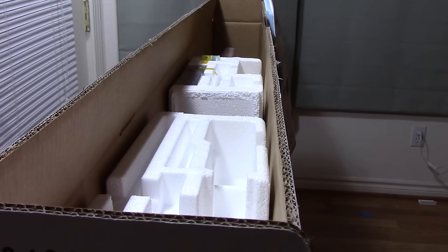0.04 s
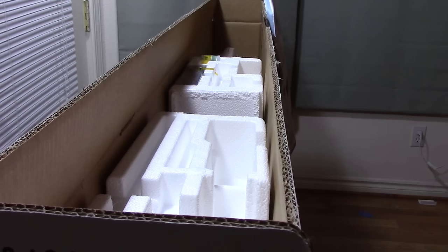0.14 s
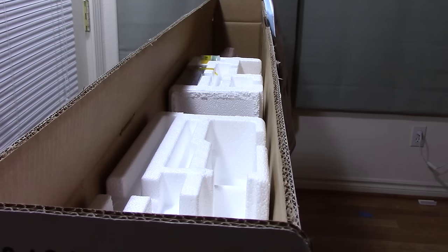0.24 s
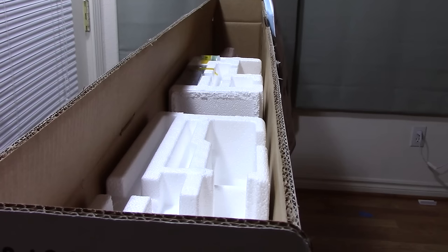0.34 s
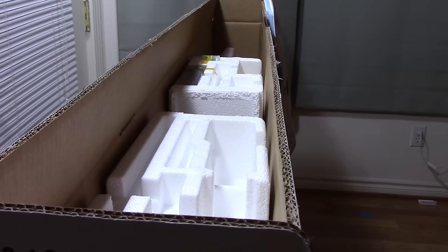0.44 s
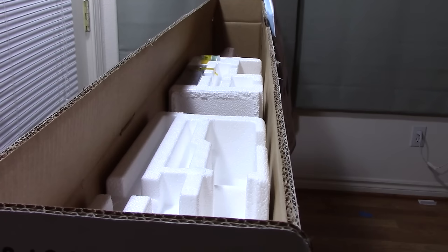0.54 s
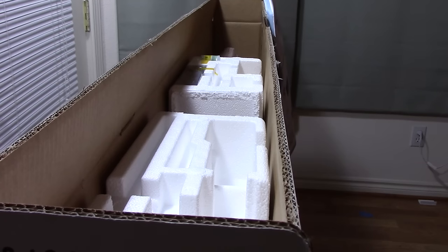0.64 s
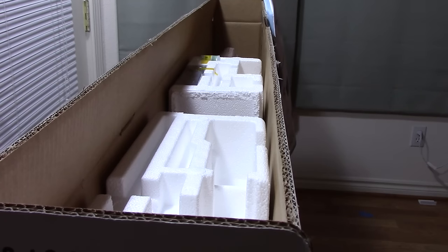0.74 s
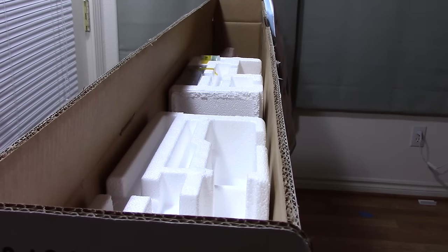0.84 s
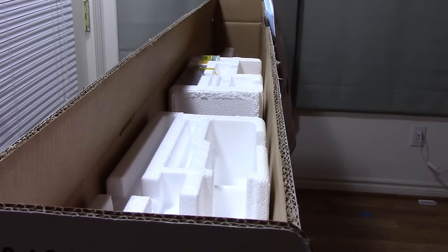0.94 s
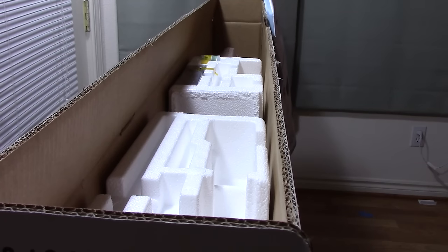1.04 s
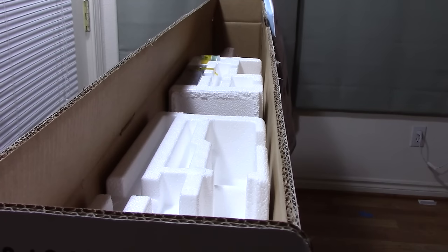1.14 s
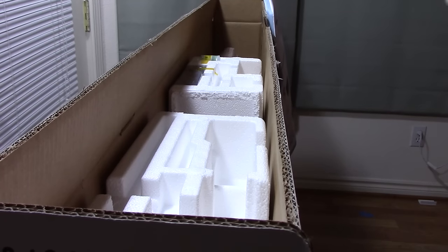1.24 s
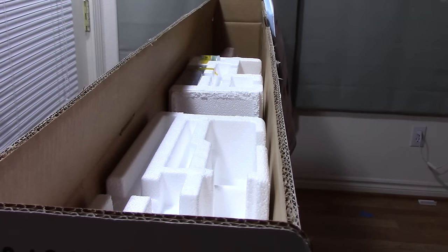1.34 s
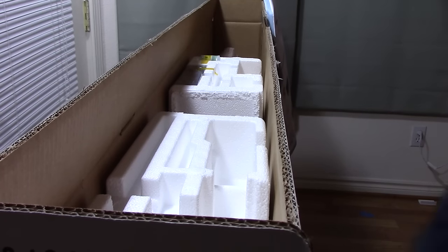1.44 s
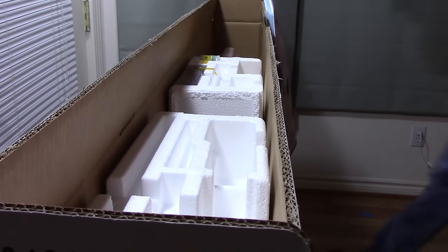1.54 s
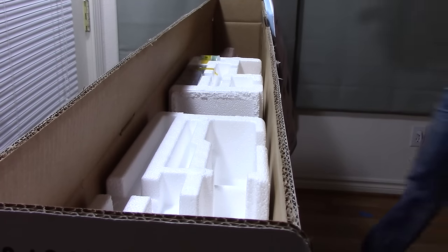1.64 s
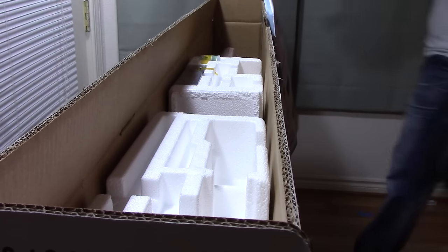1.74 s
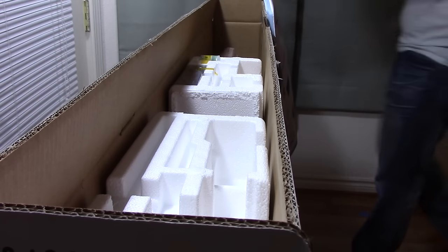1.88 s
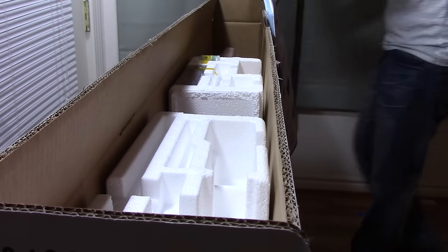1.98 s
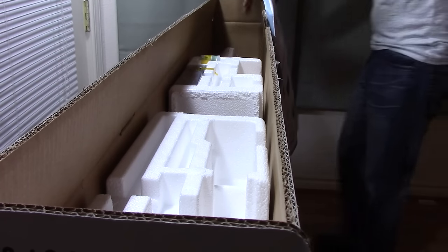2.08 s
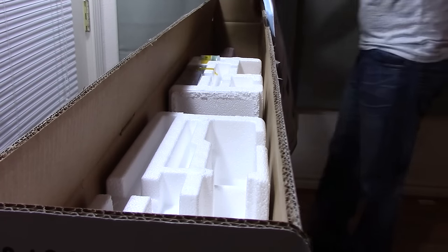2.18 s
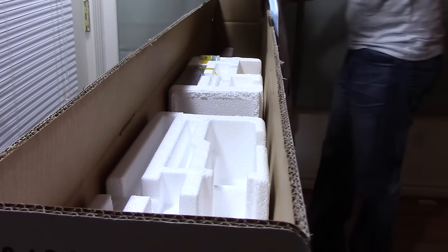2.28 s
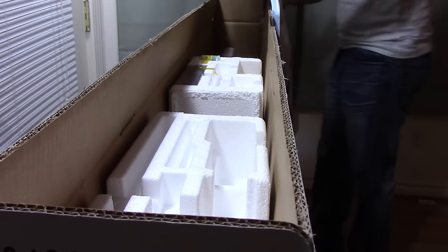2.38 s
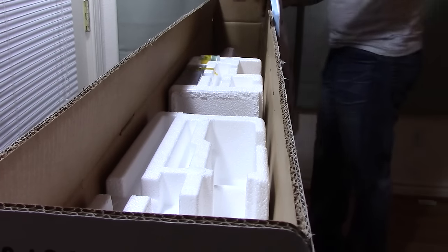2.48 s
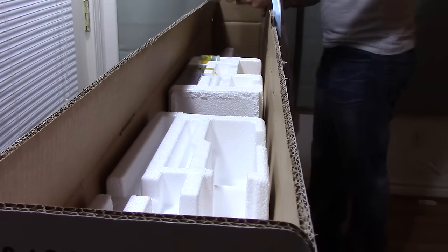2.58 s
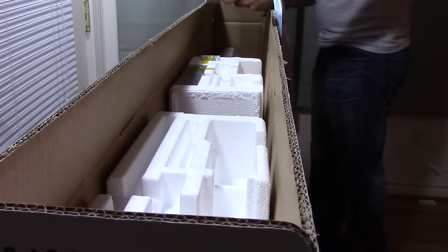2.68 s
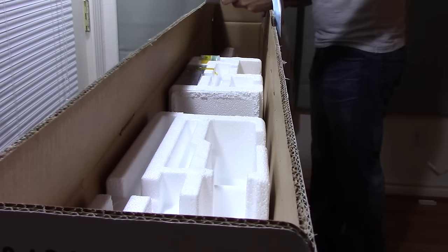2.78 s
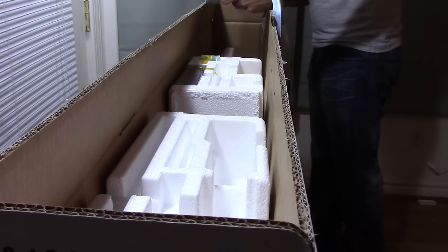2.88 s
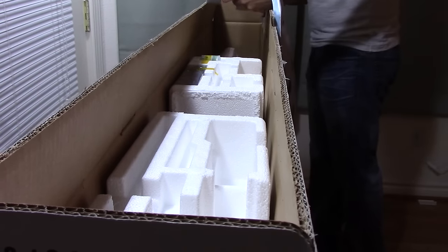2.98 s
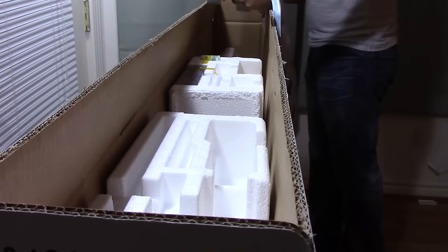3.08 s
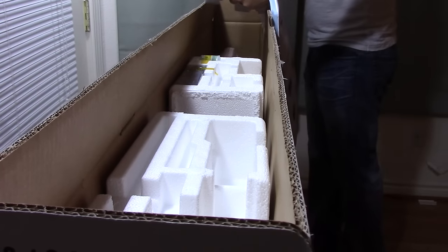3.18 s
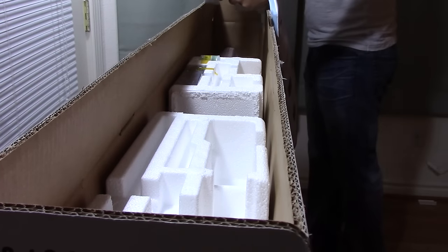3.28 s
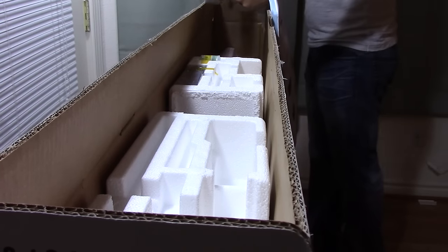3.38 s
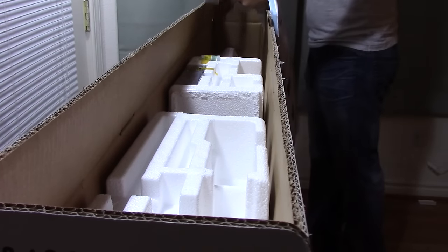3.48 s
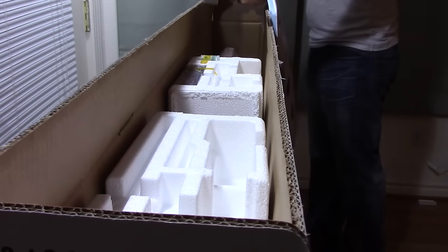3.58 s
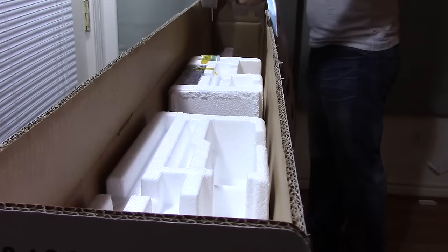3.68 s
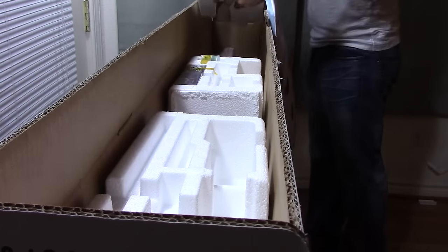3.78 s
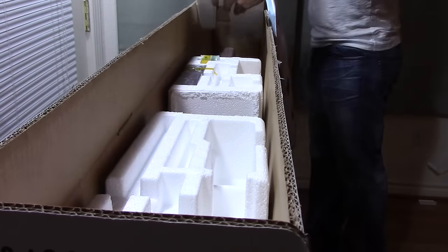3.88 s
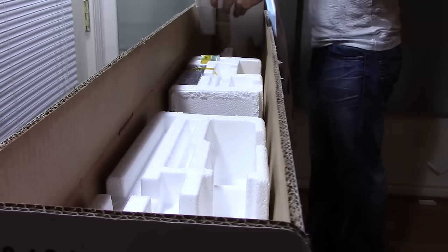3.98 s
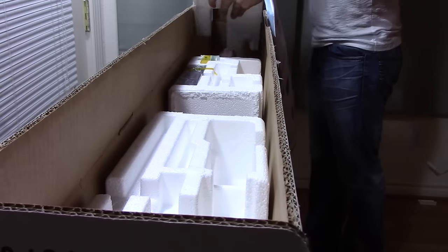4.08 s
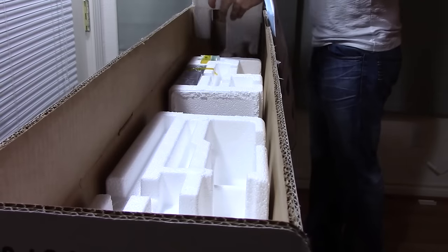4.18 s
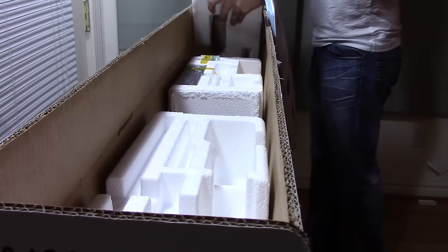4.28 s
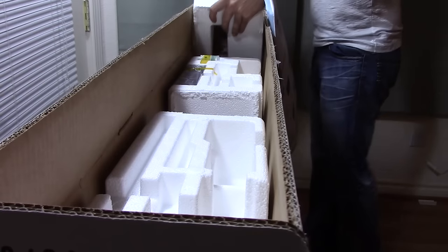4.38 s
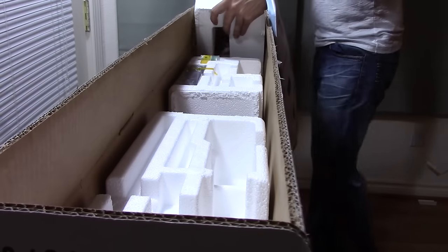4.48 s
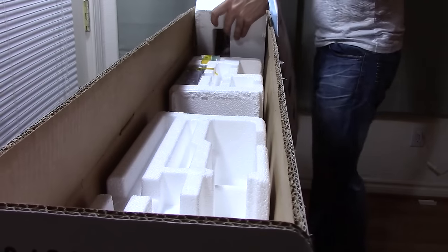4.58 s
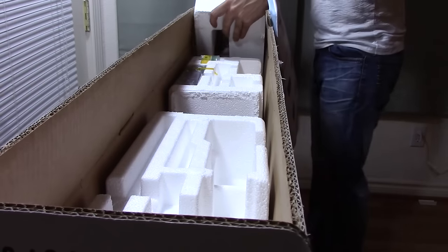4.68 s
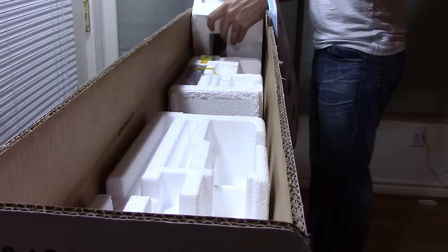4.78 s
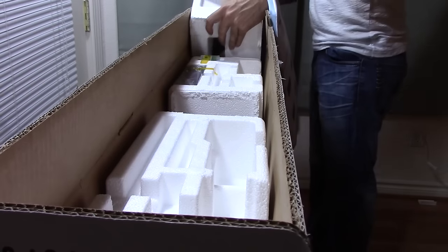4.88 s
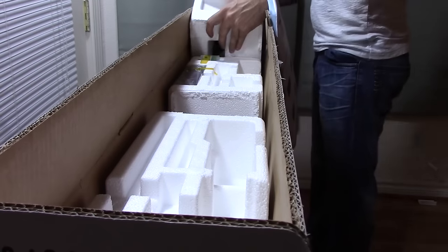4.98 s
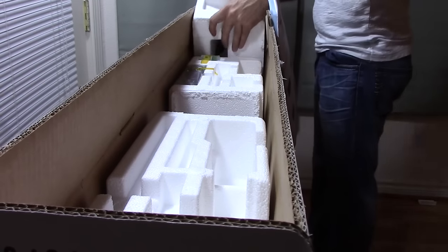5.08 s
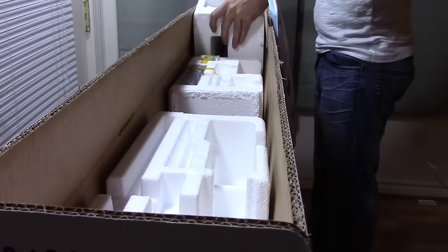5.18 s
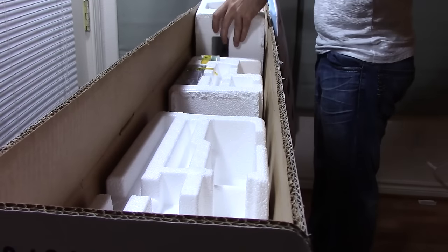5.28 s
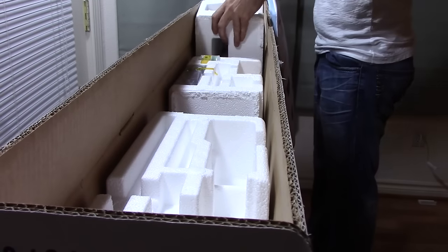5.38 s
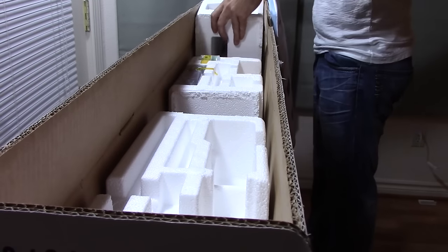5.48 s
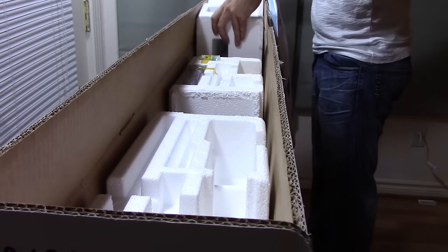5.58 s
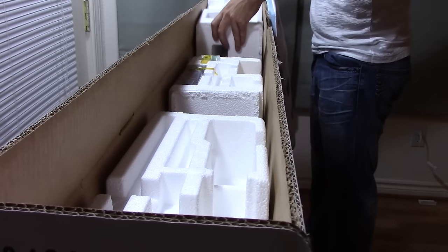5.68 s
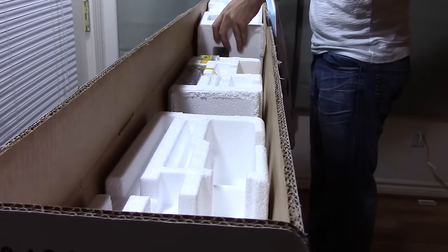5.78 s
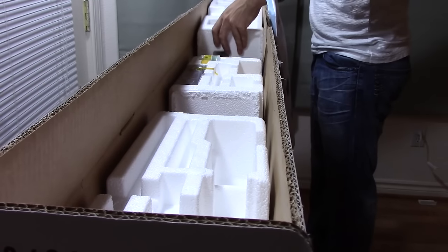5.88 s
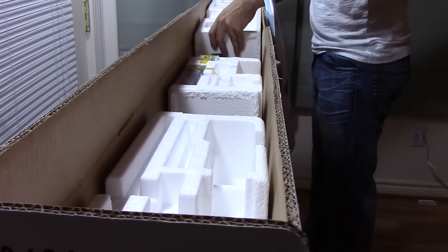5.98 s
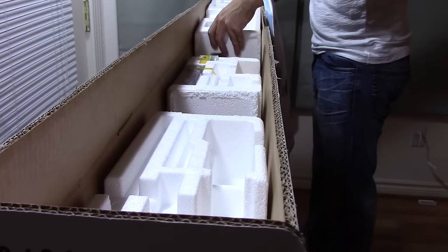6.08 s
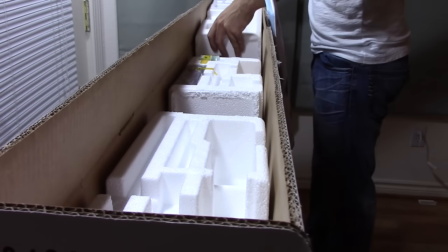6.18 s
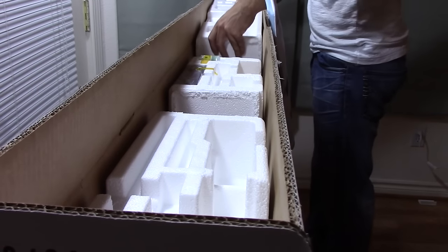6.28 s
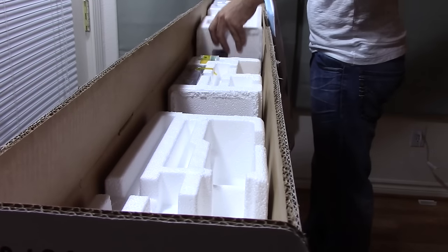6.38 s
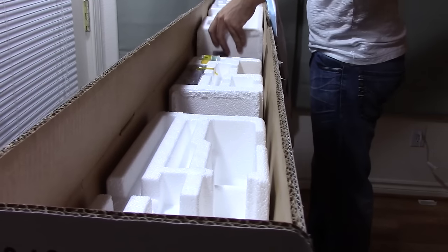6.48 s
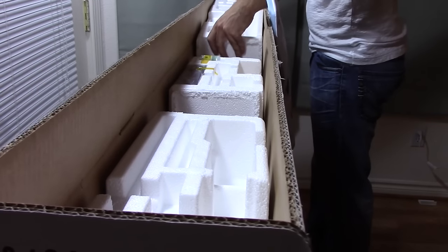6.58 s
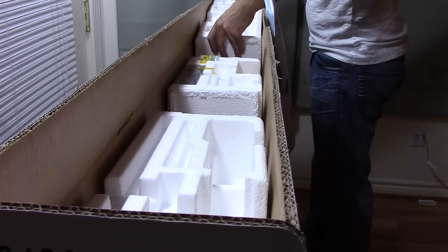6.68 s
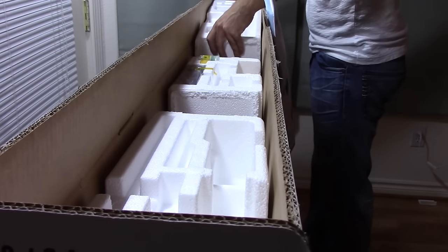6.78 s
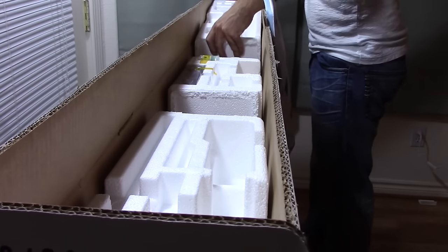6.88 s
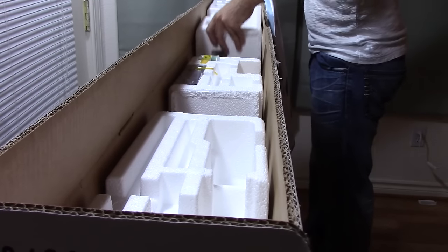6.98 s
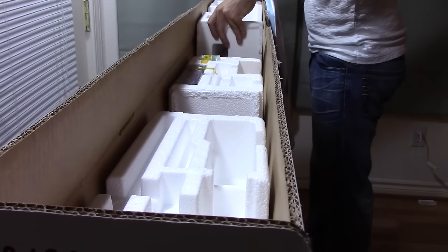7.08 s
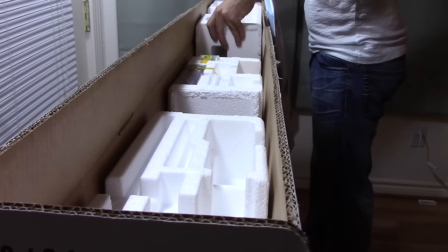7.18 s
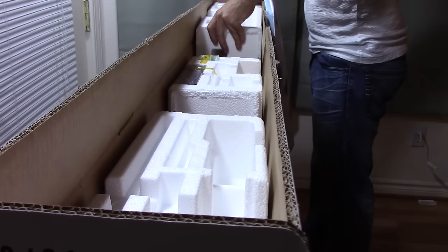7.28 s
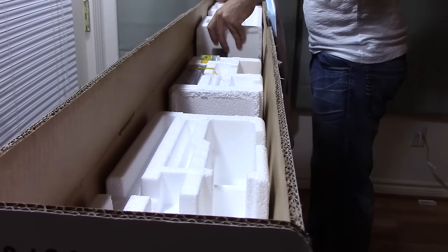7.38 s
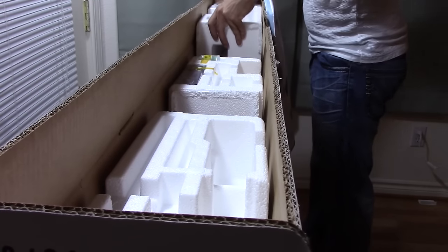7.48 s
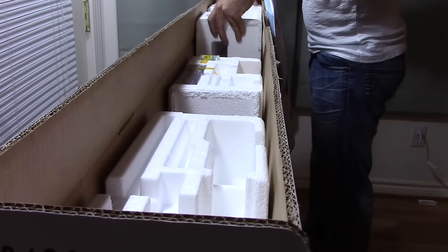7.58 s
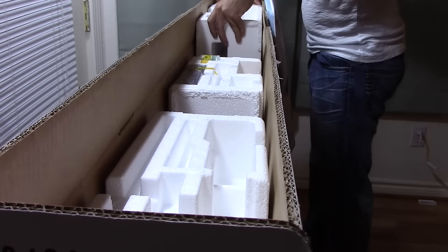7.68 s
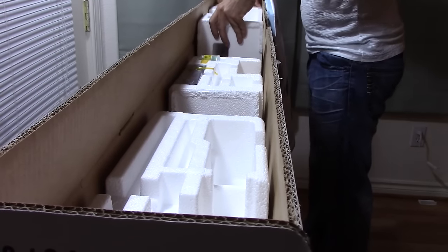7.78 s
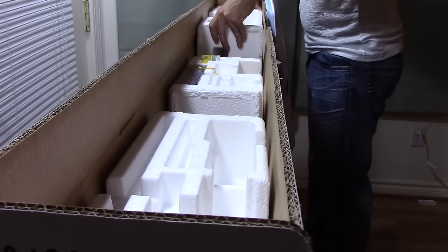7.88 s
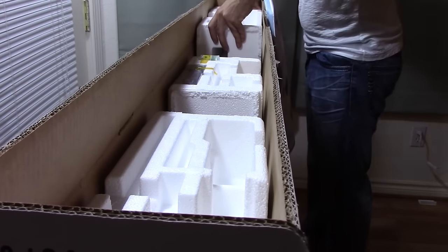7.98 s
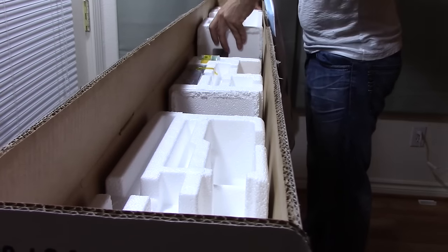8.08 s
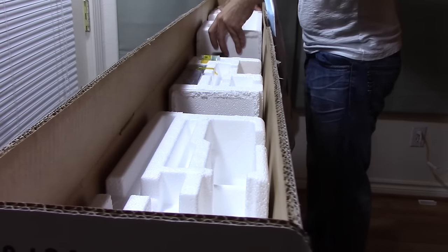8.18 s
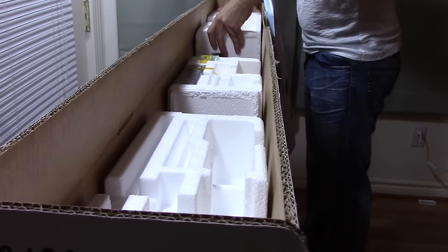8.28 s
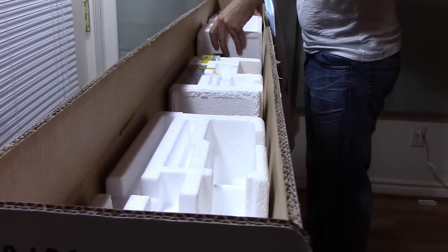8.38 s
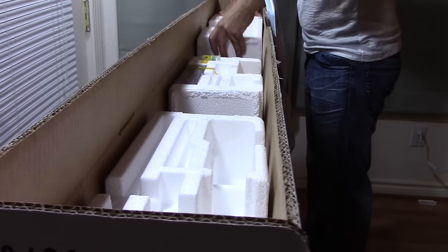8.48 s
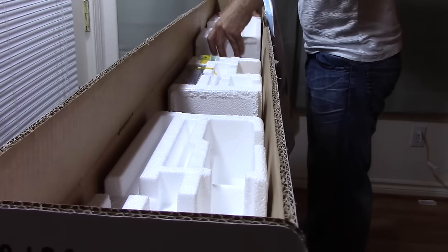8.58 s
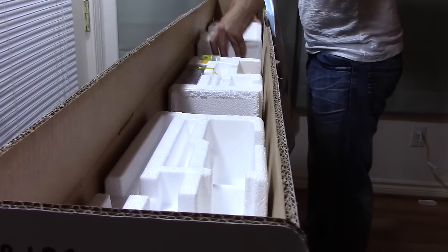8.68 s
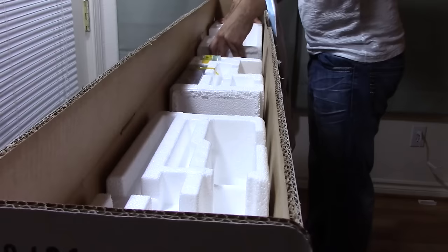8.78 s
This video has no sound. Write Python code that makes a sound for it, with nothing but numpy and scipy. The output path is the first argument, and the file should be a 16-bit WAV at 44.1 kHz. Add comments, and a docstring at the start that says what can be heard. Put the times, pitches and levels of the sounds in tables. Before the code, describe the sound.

After soft footsteps and a sharp click, dry foam rasps and squeaks along a big carton, bumping it with one strong hollow thump.

```python
"""Feet and clothes shuffle and step over a wooden floor to a tall carton; then a foam block is worked into it.
Foam beads catch and slip on the cardboard: random snaps, coloured, give scuffs, long dry scrapes and squeaks.
Bumps ring the hollow box as decaying sines with a noise rattle; steps and clicks are short filtered bursts.
A small room answers with a decaying noise tail over a soft ventilation rush; heard close by, almost in mono."""
import sys
import numpy as np
from scipy import signal
from scipy.fft import rfft, irfft, next_fast_len
from scipy.io import wavfile
from scipy.ndimage import uniform_filter1d, map_coordinates

SR = 44100
rng = np.random.default_rng(int(sys.argv[2]) if len(sys.argv) > 2 else 0)


def bounce(signal):
    """Save signal as a 16-bit WAV file at the path given by the first command-line argument."""
    frames = np.transpose(np.atleast_2d(signal))
    limited = np.clip(frames, -1, 1)
    pcm = np.round(limited * 32767).astype(np.int16)
    wavfile.write(sys.argv[1], SR, pcm)


N = 390285  # samples


def amp(db):
    """Decibels to gain."""
    return 10 ** (np.asarray(db) / 20)


def unit(x):
    """x at rms 1."""
    return x / np.sqrt(np.mean(x ** 2) + 1e-20)


def along(points, hz):
    """(Hz, value) points read on a log axis."""
    point_hz, value = np.transpose(points)
    return np.interp(np.log(hz + 1), np.log(point_hz + 1), value)


def wobble(rate_hz):
    """A smooth random curve, rate_hz knots a second."""
    knots = rng.standard_normal(int(N * rate_hz / SR) + 4)
    return map_coordinates(knots, [np.arange(N) * rate_hz / SR])


def colour(x, points, peaks=(), size=4096):
    """Causal minimum-phase filter of power gain 1 with the given spectrum and resonances."""
    hz = np.fft.rfftfreq(size, 1 / SR)
    db = along(points, hz)
    for centre_hz, width_hz, lift_db in peaks:
        db = db + lift_db / (1 + (2 * (hz - centre_hz) / width_hz) ** 2)
    cepstrum = irfft(np.log(amp(db)))
    cepstrum[0] = 0
    response = irfft(np.exp(rfft(2 * cepstrum[:size // 2], size)))
    return signal.fftconvolve(x, response / np.linalg.norm(response))[:len(x)]


def soften(x, hz):
    """A soft contact loses what lies above hz; the first 20 ms come out at rms 1."""
    low = signal.butter(4, min(hz, SR / 4), fs=SR, output="sos")
    y = signal.sosfilt(low, x)
    return y / np.sqrt(np.mean(y[:SR // 50] ** 2))


def add(track, s, sound):
    """Mix a sound into the track at time s."""
    start = max(round(s * SR), 0)
    track[start:start + len(sound)] += sound[:N - start]


def slips(rate_hz, clump_db, clump_rate_hz):
    """Random tiny snaps, in clumps, as contacts let go; rms 1."""
    snaps = (rng.random(N) < rate_hz / SR) * rng.standard_normal(N)
    return unit(snaps * amp(clump_db * wobble(clump_rate_hz)))


COAST_DB_PER_S, SAG_DB_PER_S = 127, 10  # speed: run-out after the stroke, sag throughout


def strokes(rows, powers):
    """One gain per dB column for strokes that speed up, sag and coast; each grows with a power of the speed."""
    energy, t = np.zeros((len(powers), N)), np.arange(SR) / SR
    for s, rise_s, length_s, *levels_db in rows:
        gather = np.sin(np.pi / 2 * np.minimum(t / rise_s, 1))
        coast_s = np.maximum(t - length_s, 0)
        speed = gather * amp(-SAG_DB_PER_S * t - COAST_DB_PER_S * coast_s)
        for layer, db, power in zip(energy, levels_db, powers):
            add(layer, s, (amp(db) * speed ** power) ** 2)
    return np.sqrt(energy)


# Pushes of the block along the cardboard. Each row: start in seconds, speeding up in seconds,
# length before coasting in seconds, then relative rasp, edge hiss and wall drone in dB.
PUSHES = [(2.92, 0.088, 0.18, -43, -50.5, -51), (3.12, 0.062, 0.15, -49, -65, -52),
          (3.5, 0.045, 0.12, -44.5, -59, -44), (3.63, 0.1, 0.14, -44, -46, -56),
          (3.76, .13, 0.2, -42.5, -40.5, -58), (4.0, .02, .06, -49, -53, -48.5),
          (4.11, 0.06, 0.06, -30, -38.5, -36), (4.2, .075, 0.048, -36.5, -33, -49),
          (4.415, 0.087, 0.092, -34.5, -42, -32.5), (4.54, 0.044, 0.067, -33, -43, -41),
          (4.68, 0.16, .32, -29, -32.5, -37), (4.98, 0.097, 0.18, -34, -34.5, -39),
          (5.15, 0.1, .15, -34.5, -32, -42), (5.3, 0.059, 0.19, -38, -44.5, -46.5),
          (5.41, 0.22, 0.26, -31, -34.5, -41), (5.66, 0.1, .16, -34, -36, -44),
          (5.82, 0.097, 0.11, -34.5, -35.5, -46.5), (5.98, .04, .1, -51, -54.5, -47.5),
          (6.13, 0.11, 0.16, -46, -46.5, -48), (6.3, 0.047, 0.098, -37, -41, -48),
          (6.46, 0.047, .15, -41.5, -43.5, -44.5), (6.62, 0.1, .14, -46, -53.5, -44),
          (6.76, 0.028, 0.084, -45, -49, -46), (6.89, .16, 0.23, -42, -41.5, -45.5),
          (7.13, 0.033, 0.071, -44.5, -50, -45), (7.2, 0.068, 0.059, -33.5, -35.5, -46),
          (7.3, 0.11, 0.085, -39.5, -39, -41.5), (7.42, 0.1, 0.22, -42.5, -45, -44.5),
          (7.73, 0.11, 0.15, -34.5, -37, -45), (8.06, .07, 0.079, -46.5, -51, -49),
          (8.135, .025, 0.037, -38, -40, -44), (8.2, 0.19, 0.15, -30.5, -34, -40),
          (8.4, 0.18, 0.13, -36, -39.5, -37), (8.6, 0.053, .09, -29.5, -30.5, -37.5),
          (8.7, 0.045, 0.11, -36.5, -43, -36.5)]
# Short catches of the foam. Each row: start in seconds, relative rasp in dB, decay length in seconds,
# edge hiss over rasp in dB.
SCUFFS = [(2.684, -44.5, 0.032, -3.5), (2.739, -33, 0.051, -9), (2.802, -49, 0.074, -21),
          (2.958, -37.5, 0.017, -11), (3.21, -42.5, 0.017, -4), (3.365, -60, .015, 2),
          (3.475, -48, 0.041, 2.5), (3.542, -29.5, 0.02, -15), (3.949, -28, 0.025, -4),
          (4.007, -43, 0.015, 7), (4.105, -42, 0.029, 10), (4.262, -35, 0.03, 2.5),
          (4.397, -23.5, 0.029, -2.5), (8.306, -42, 0.052, 5), (8.516, -46, 0.013, 3)]
# Foam block resonances. Each row: centre in Hz, width in Hz, lift in dB.
FOAM_PEAKS = [(1536, 104, 3), (1760, 160, 2), (2720, 140, 3.5), (3270, 890, 1.5), (5280, 540, 1.5),
              (9800, 1500, 7)]
# Carton wall and air modes. Each row: frequency in Hz, relative level in dB, t60 in seconds.
CARTON_MODES = [(133.8, -12.5, 0.38), (199, -10, 0.238), (312.6, 1, 0.092), (320.8, -9, 0.44),
                (343.6, 4, 0.089), (457.7, -4, 0.2), (485, -10, 0.12), (562, -12, 0.14), (628.2, -0.5, 0.2),
                (701, -12.5, 0.16), (773, -2, 0.12), (865, -5, .13), (1003, -35, 0.088), (1097, -20, .12)]
# Spectra of foam rasp, edge hiss and cardboard wall. Each row: frequency in Hz, relative level in dB.
RASP_SPECTRUM = [(200, -33), (500, -1), (900, -0.5), (2000, 1), (3500, -0.5), (5500, -4), (8000, -10.5),
                 (12000, -22.5), (16000, -44)]
HISS_SPECTRUM = [(1500, -38.5), (4000, -5), (7000, -1), (10000, -0.5), (12500, -3.5), (14500, -10.5),
                 (16000, -15)]
WALL_SPECTRUM = [(60, -20.5), (100, -17.5), (140, -3), (300, -0.5), (620, -0.5), (900, -3.5), (1400, -6.5),
                 (3000, -47)]
HISS_POWER, WALL_POWER = 1.55, 0.57  # growth with speed; rasp is 1, so the drone lingers
CATCH_S, CATCH_WALL_DB = 0.0048, -10.5  # a catch's release time; wall drone over its rasp


def scrape():
    """Sliding foam rasps, its edges hiss, and the cardboard wall drones under it."""
    rasp, hiss, wall = strokes(PUSHES, (1, HISS_POWER, WALL_POWER))
    t = np.arange(SR // 4) / SR
    for s, db, length_s, hiss_db in SCUFFS:
        # lets go quickly, runs out as the block slows
        burst = amp(db) * (1 - np.exp(-t / CATCH_S)) * np.exp(-(t / length_s) ** 2)
        add(rasp, s, burst)
        add(hiss, s, burst * amp(hiss_db))
        add(wall, s, burst * amp(CATCH_WALL_DB))

    def beads():
        return slips(rate_hz=14000, clump_db=-0.63, clump_rate_hz=340)

    judder = amp(0.66 * wobble(45))
    rasping = colour(judder * rasp * beads(), RASP_SPECTRUM, FOAM_PEAKS)
    hissing = colour(judder * hiss * beads(), HISS_SPECTRUM)
    box_peaks = [(hz, 28, 4) for hz, _, _ in CARTON_MODES]
    wall_slips = slips(rate_hz=1500, clump_db=2.5, clump_rate_hz=35)
    drone = colour(wall * wall_slips, WALL_SPECTRUM, box_peaks)
    return rasping + hissing + drone


def shifting(x, depth_db, size=7):
    """The contact patch moves, so narrow resonances come and go."""
    z = signal.stft(x, nperseg=1024)[2]
    field = uniform_filter1d(rng.standard_normal(z.shape), size=3, axis=0)  # across frequency
    field = uniform_filter1d(field, size, axis=1)  # across time
    return signal.istft(z * amp(depth_db * unit(field)), nperseg=1024)[1][:N]


# Squeaks on a block resonance. Each row: middle in seconds, half length in seconds,
# frequency in Hz, relative level in dB.
SQUEAKS = [(2.762, 0.023, 1790, -37), (2.762, 0.022, 2910, -41), (3.224, 0.011, 3600, -40),
           (3.563, 0.014, 760, -31.5), (3.702, 0.055, 1920, -43), (3.721, 0.066, 2500, -46),
           (4.164, 0.021, 1090, -33), (4.622, 0.063, 2200, -39), (5.013, 0.056, 662, -35.5),
           (8.2, 0.058, 1540, -39.5), (8.355, 0.069, 1560, -37.5), (8.521, 0.067, 1620, -37.5),
           (8.524, 0.046, 1180, -37), (8.718, .04, 1530, -35), (8.82, 0.091, 1380, -40)]
SQUEAK_Q = 12.5  # sharpness


def squeaks():
    """Slips lock onto a resonance of the block for a moment: a hoarse, narrow tone."""
    track, t = np.zeros(N), np.arange(-SR // 4, SR // 4) / SR
    hz = np.fft.rfftfreq(len(t), 1 / SR)
    for s, half_s, centre_hz, db in SQUEAKS:
        resonance = 1 / (1 + (SQUEAK_Q * (hz / centre_hz - 1)) ** 2 * 2)
        tone = irfft(rfft(rng.standard_normal(len(t))) * resonance, len(t))
        add(track, s + t[0], amp(db - 1) * unit(tone) * np.exp(-(t / half_s) ** 2))
    return track


# Block bumps on the carton. Each row: start in seconds, relative level in dB, contact brightness in Hz.
KNOCKS = [(3.216, -37, 546), (3.558, -37, 700), (3.962, -30, 640), (4.176, -35.5, 450), (4.298, -37, 450),
          (4.405, -12.5, 850), (4.415, -18.5, 1100), (4.44, -26, 786), (4.483, -16, 895), (4.51, -22, 900),
          (4.678, -22.5, 860), (4.706, -29, 754), (5.08, -18, 477), (5.136, -28, 400), (5.294, -27, 307),
          (5.504, -25.5, 490), (6.681, -41.5, 294), (6.782, -34, 650), (6.829, -39, 450), (7.119, -37, 230),
          (7.17, -38, 450), (7.431, -32.5, 247), (7.494, -36.5, 320), (8.35, -34.5, 274), (8.495, -38, 647),
          (8.574, -27.5, 666), (8.801, -37, 600)]
# The bump's run along the box and back: delay in seconds, low edge in Hz, high edge in Hz, gain in dB.
FLUTTER = (0.16, 258, 388, -7)


def knocks():
    """Each bump rings the carton at new strengths, rattles its panels and returns once from the far end."""
    track, t = np.zeros(N), np.arange(SR * 3 // 4) / SR
    for s, db, bright_hz in KNOCKS:
        ring = np.zeros(len(t))
        for hz, level_db, t60_s in CARTON_MODES:
            strength, phase = rng.standard_normal(2)
            decay = amp(level_db + 1.37 * strength - 60 * t / t60_s)
            ring += decay * np.sin(2 * np.pi * hz * t + phase)
        rattle = colour(rng.standard_normal(len(t)) * amp(-60 * t / 0.085), WALL_SPECTRUM)
        # thin panels radiate little below their lowest mode
        b, a = signal.butter(2, 130, "high", fs=SR)
        thud = signal.lfilter(b, a, ring + amp(1.5) * rattle)
        add(track, s, amp(db - 2.5) * soften(thud, bright_hz))
    delay_s, low_hz, high_hz, echo_db = FLUTTER
    b, a = signal.butter(2, [low_hz, high_hz], "band", fs=SR)
    back = signal.lfilter(b, a, track)
    add(track, delay_s, amp(echo_db) * back)
    return track


# Steps and floor creaks. Each row: start in seconds, relative level in dB, brightness in Hz.
STEPS = [(.151, -36.5, 593), (0.185, -39, 900), (.275, -41.5, 1000), (.907, -33.5, 686),
         (1.022, -33.5, 1610), (1.711, -32, 1530), (2.181, -36.5, 1220)]
# Floorboard spectrum. Each row: frequency in Hz, relative level in dB.
FLOORBOARD_SPECTRUM = [(40, -31), (100, -14.5), (230, 4.5), (400, 7), (700, -2), (1100, -10), (1600, -1.5),
                       (2400, -5), (8000, -2)]


def steps():
    """A heel pushes the boards once and they shudder briefly: an impulse, then decaying noise."""
    track, t = np.zeros(N), np.arange(SR // 3) / SR
    for s, db, bright_hz in STEPS:
        blow = amp(-23.5) * rng.standard_normal(len(t)) * amp(-60 * t / 0.11)
        blow[0] = 1
        add(track, s, amp(db - 2.5) * soften(colour(blow, FLOORBOARD_SPECTRUM), bright_hz))
    return track


# Small sharp clicks. Each row: start in seconds, relative level in dB.
CLICKS = [(0.027, -43), (2.176, -19), (2.2656, -46), (2.9642, -32), (3.214, -42), (4.2764, -29)]
# Click spectrum. Each row: frequency in Hz, relative level in dB.
CLICK_SPECTRUM = [(200, -5), (800, 2.5), (2500, -4.5), (4000, -10), (10000, -22), (16000, -35)]


def clicks():
    """Hard little contacts: noise bursts, over in a few milliseconds."""
    track, t = np.zeros(N), np.arange(SR // 10) / SR
    for s, db in CLICKS:
        add(track, s, amp(db - 10) * rng.standard_normal(len(t)) * amp(-60 * t / 0.028))
    return colour(track, CLICK_SPECTRUM)


# Shuffles of feet and clothes. Each row: start in seconds, speeding up in seconds,
# length before coasting in seconds, then relative rub and swish in dB.
SHUFFLES = [(0, 0.0017, .03, -39, -48.5), (.04, 0.046, 0.14, -56, -50), (.14, 0.057, 0.055, -36.5, -52),
            (.23, 0.031, 0.064, -37.5, -46.5), (.365, .04, 0.081, -43, -44), (.45, 0.057, 0.078, -46, -41),
            (.56, 0.035, 0.1, -46, -50), (.65, 0.036, 0.07, -42.5, -43.5), (.77, 0.031, 0.066, -47.5, -49),
            (2.185, .04, .06, -66, -53.5)]
# Spectra of the dull rub and the light swish. Each row: frequency in Hz, relative level in dB.
RUB_SPECTRUM = [(50, -46), (150, -11), (280, -6), (400, 0), (700, -2.5), (1200, -9.5), (1750, -13),
                (2300, -14.5), (6000, -32.5)]
SWISH_SPECTRUM = [(500, -12), (1200, 4.5), (2500, -1), (5000, -2), (9000, -5.5), (13000, -14.5),
                  (16000, -23)]


def shuffle():
    """Feet and clothes rub with a dull body and a light swish, both made of fibre slips."""
    rub, swish = strokes(SHUFFLES, (1, HISS_POWER))

    def fibres():
        return slips(rate_hz=6000, clump_db=-0.5, clump_rate_hz=110)

    body = colour(amp(-2) * rub * fibres(), RUB_SPECTRUM)
    return body + colour(amp(-0.5) * swish * fibres(), SWISH_SPECTRUM)


# Rush of air. Each row: frequency in Hz, relative level in dB.
AIR_SPECTRUM = [(15, -61), (25, -42), (68, -11), (92, -17.5), (105, -28), (137, -11), (206, -21),
                (242, -5.5), (326, -13.5), (354, -8), (516, -16), (1040, -17.5), (1230, -22.5), (6920, -35),
                (16000, -49.5)]
# Duct resonances. Each row: centre in Hz, width in Hz, lift in dB.
DUCT_PEAKS = [(58, 14, -0.5), (238, 11, 7), (940, 98, 2.5)]


def ventilation():
    """A soft rush of air: coloured noise, its level barely wavering."""
    level = amp(-49.5 + 0.23 * wobble(6.4))
    return level * colour(rng.standard_normal(N), AIR_SPECTRUM, DUCT_PEAKS)


# Room decay. Each row: frequency in Hz, t60 in seconds.
ROOM_T60 = [(100, 0.38), (400, 0.58), (2000, 0.72), (6000, 0.48), (14000, 0.079)]


def room(x):
    """The walls' answer: a noise tail after 6 ms, each frequency dying at its own speed."""
    hz, t, z = signal.stft(rng.standard_normal(SR // 2), SR, nperseg=256)
    decay = amp(-60 * t / along(ROOM_T60, hz)[:, None])
    tail = signal.istft(z * decay, SR, nperseg=256)[1]
    tail = np.pad(tail, (round(0.006 * SR), 0))
    return signal.fftconvolve(x, tail / np.linalg.norm(tail))[:N]


# Stereo spread of the room. Each row: frequency in Hz, gain of the side reverberation in dB.
SIDE_GAIN = [(60, -16), (250, -42), (1000, -60), (2200, -35), (4000, -23.5), (14000, -17.5)]


def scene():
    """All sources in the room; only diffuse sound differs between the two channels."""
    foam = shifting(scrape(), depth_db=2) + squeaks()
    bumps, feet = knocks(), steps() + clicks()
    direct = foam + bumps + feet + shuffle()
    reverb = room(amp(-10.5) * foam + amp(-13) * bumps + amp(-7) * feet)
    mid = direct + reverb + ventilation()
    side_gain = amp(along(SIDE_GAIN, np.fft.rfftfreq(2 * N, 1 / SR)))
    side = irfft(rfft(room(direct), 2 * N) * side_gain)[:N]
    side = side + amp(-12) * ventilation()
    return np.array([mid + side, mid - side])


LOW_HZ, TOP_HZ = 52, 15850  # band edges


def record(dry):
    """The pickup cuts the deepest bass and keeps nothing above its band limit."""
    high_pass = signal.butter(4, LOW_HZ, "high", fs=SR, output="sos")
    thin = signal.sosfilt(high_pass, dry)
    size = next_fast_len(N + SR // 2)
    keep = np.fft.rfftfreq(size, 1 / SR) < TOP_HZ
    return irfft(rfft(thin, size) * keep, size)[:, :N]


dry = scene()
out = record(dry)
bounce(out)
```